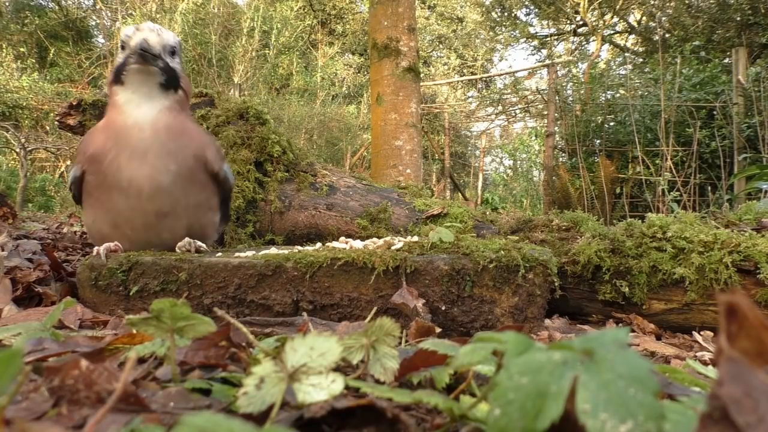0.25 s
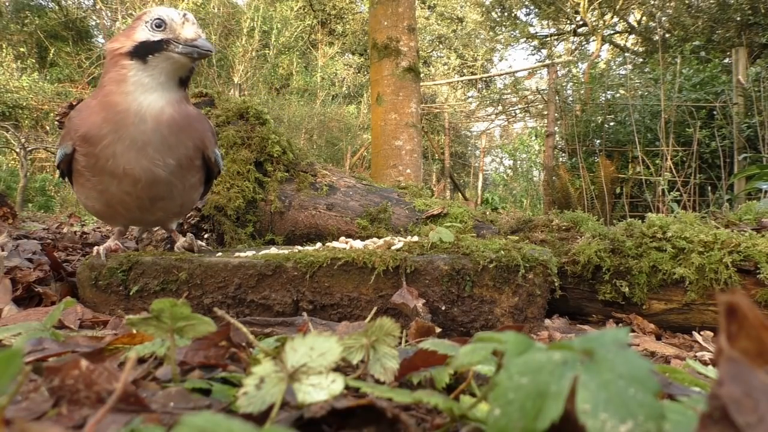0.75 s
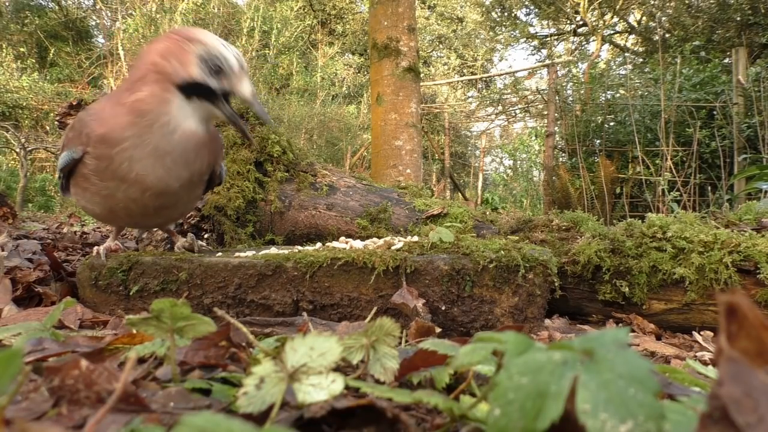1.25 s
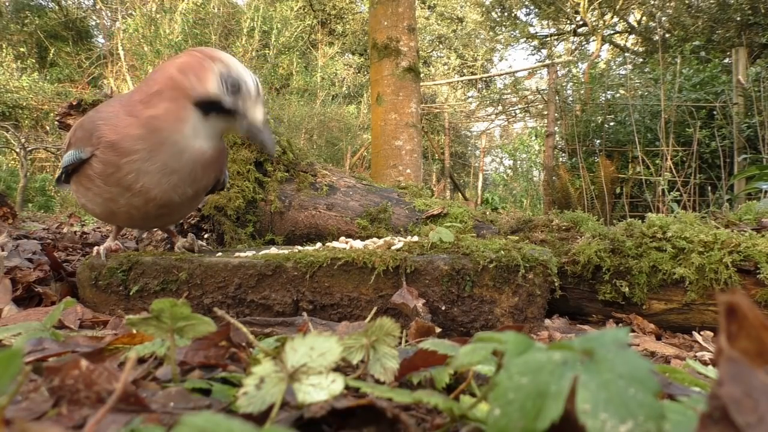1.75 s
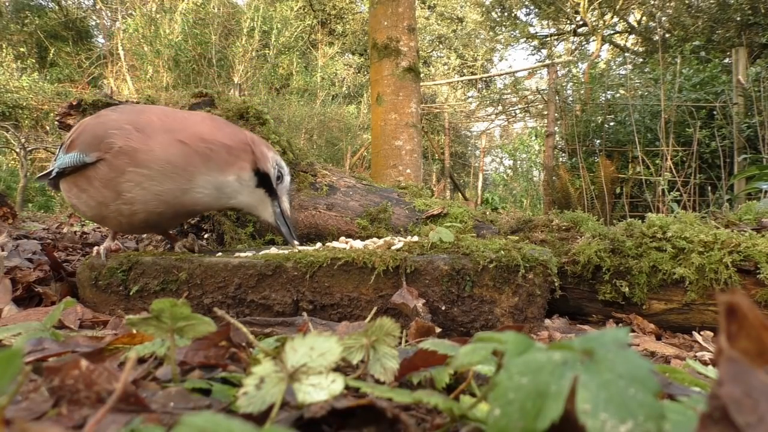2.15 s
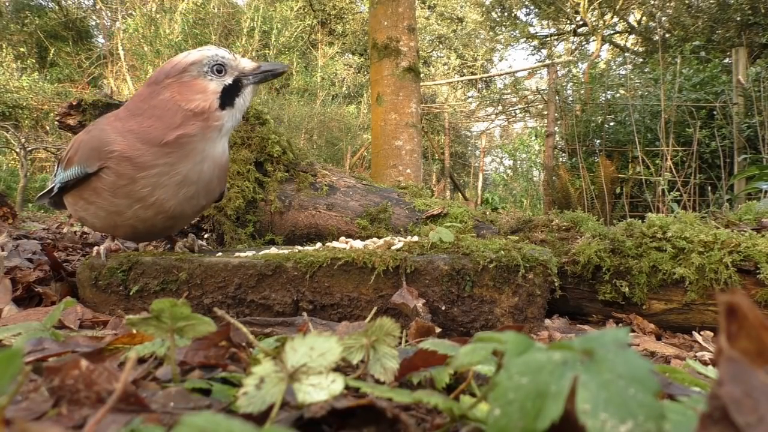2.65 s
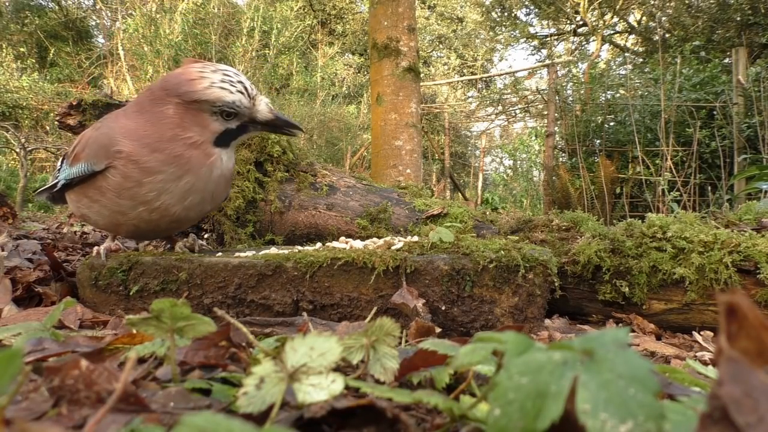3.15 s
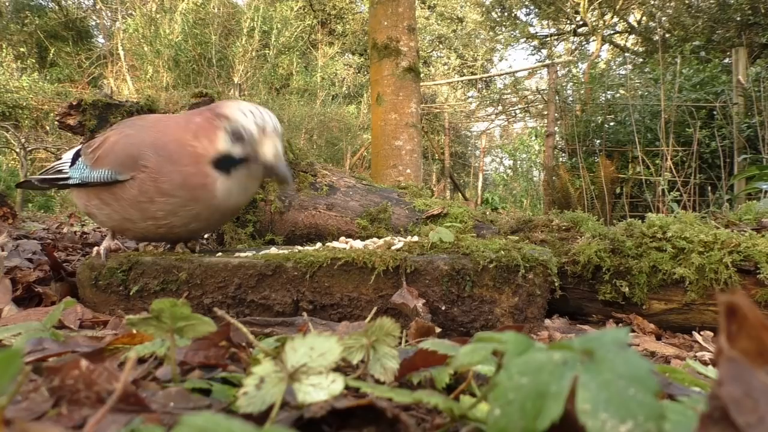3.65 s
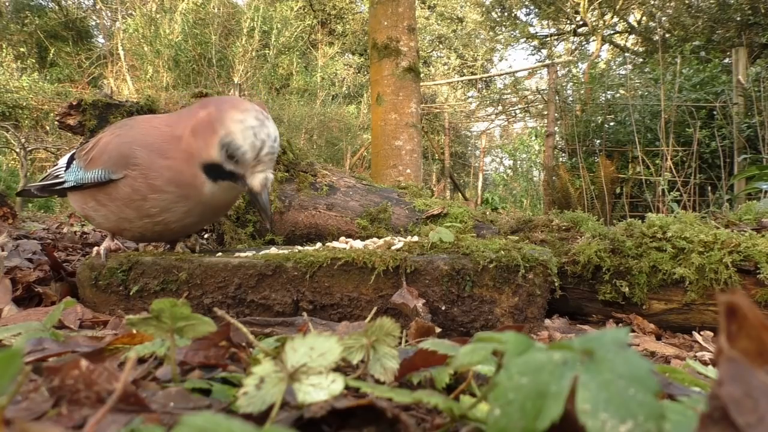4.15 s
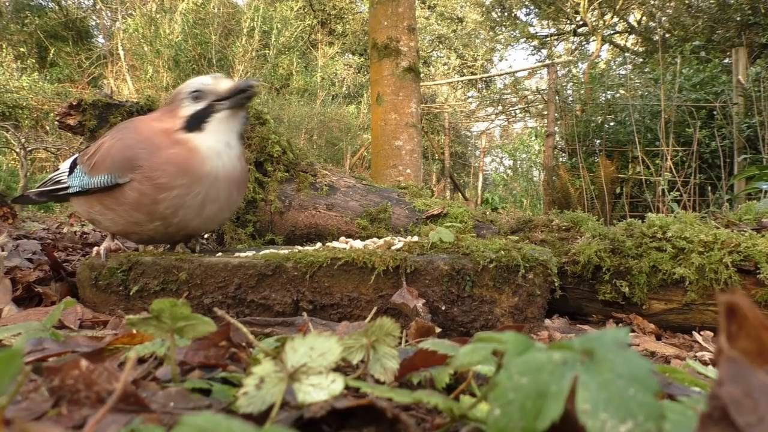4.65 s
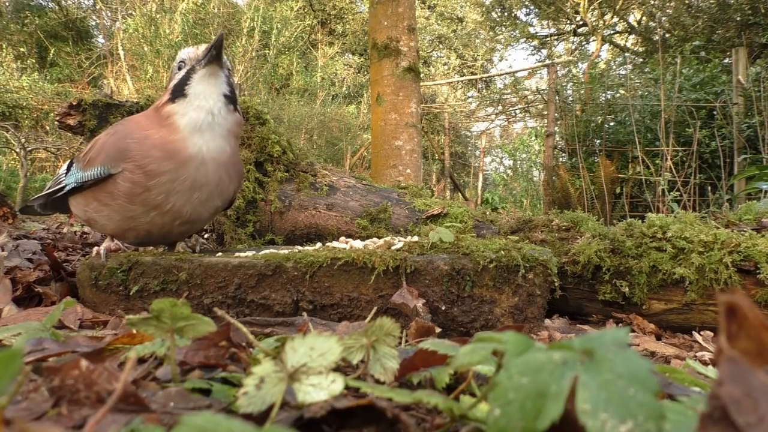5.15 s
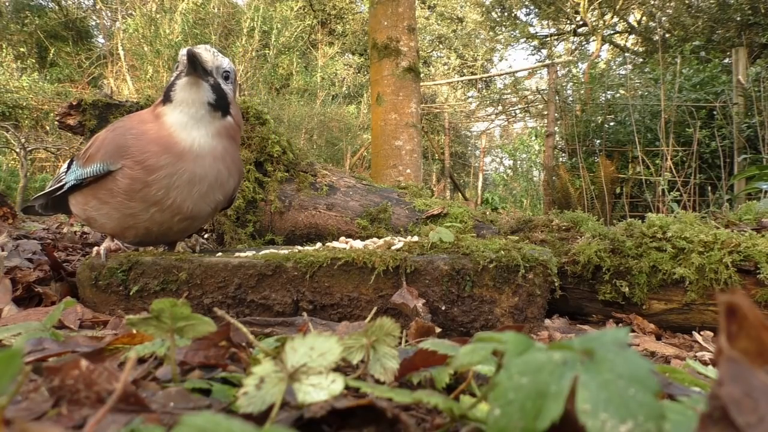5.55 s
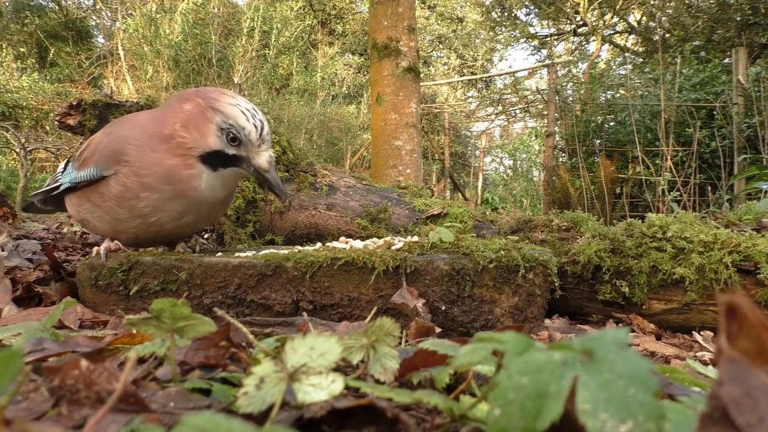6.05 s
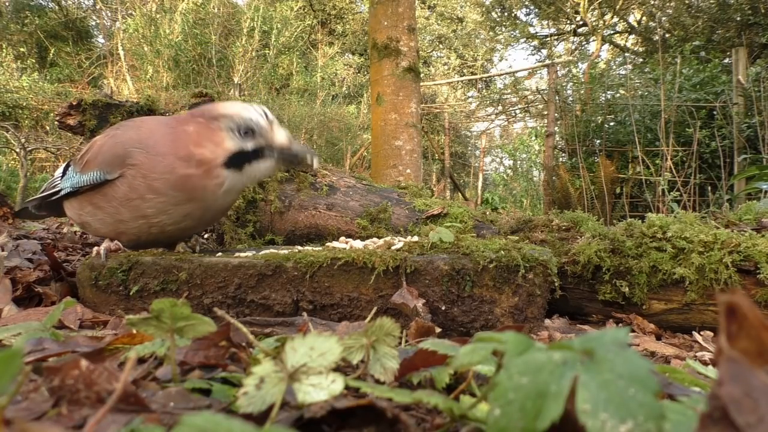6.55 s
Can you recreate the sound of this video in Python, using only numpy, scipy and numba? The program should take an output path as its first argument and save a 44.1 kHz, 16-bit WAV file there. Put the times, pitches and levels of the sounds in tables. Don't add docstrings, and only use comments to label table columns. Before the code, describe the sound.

A jay close by lands on a log, pecks at seeds and gives three harsh rasping screeches while small birds whistle and scold in woodland.

```python
import sys
import numpy as np
from scipy import signal
from scipy.io import wavfile
from scipy.ndimage import uniform_filter1d
from numba import njit

SR = 44100
rng = np.random.default_rng(int(sys.argv[2]) if len(sys.argv) > 2 else 0)


def persist_wave(psi):
    counts = np.round(np.clip(psi, -1, 1) * 32767).astype(np.int16)
    wavfile.write(sys.argv[1], SR, np.atleast_2d(counts).T)


def convert_level_to_amplitude(level_db):
    exponent = np.asarray(level_db, float) / 20
    return 10 ** exponent


N = 300321

# pitch_hz, level_db (per Hz)
TRAFFIC_SPECTRUM = [(12, -45), (20, -14.5), (69, -0.5), (97, -4.5), (129, -3), (201, -5), (286, -8),
                    (315, -6.5), (393, -10), (743, -26.5), (900, -21), (1170, -51), (1980, -120)]
# pitch_hz, level_db (per Hz)
HISS_SPECTRUM = [(500, -33), (850, -6.5), (1180, -0.5), (1690, -5), (1820, -4.5), (2570, -7), (3120, -6.5),
                 (3990, -12), (8450, -22), (12100, -16.5), (16000, -18.5)]
# pitch_hz, likeness_0_to_1
AIR_LIKENESS = [(30, 0.35), (70, 0.63), (180, 0.25), (550, 0.19), (1650, 0.081), (4970, 0.35),
                (15000, 0.75)]
# pitch_hz, left_minus_right_db
AIR_LEAN = [(60, -2), (240, 0.5), (950, 0), (3770, 0.5), (15000, 0.5)]
AIR_DB, HISS_RE_TRAFFIC_DB = -56.5, -16
STIR_DB, SETTLE_S, CALM_DB, BREEZE_DB_PER_S = 7.5, 0.42, -3.6, 0.4

# start_s, end_s, from_hz, to_hz, level_db (rms)
FAR_THIN = [
    (0, 0.144, 7120, 7060, -70),
    (1.672, 1.688, 6440, 6150, -61.5),
    (2.402, 2.412, 7800, 7580, -64),
    (6.571, 6.664, 3890, 3830, -71),
]
FAR_FLUTING = [
    (4.36, 4.487, 3880, 3810, -66.5),
    (4.474, 4.664, 3450, 3325, -63.5),
    (4.659, 4.81, 3500, 3360, -74),
    (5.479, 5.952, 3830, 3780, -66),
    (5.607, 5.86, 3240, 3180, -74),
    (5.94, 6.15, 3110, 3130, -69),
]
FAR_TWITTER = [
    (4.83, 5.447, 8250, 7800, -66),
    (5.405, 5.435, 3640, 3900, -64.5),
    (5.434, 5.491, 4340, 4880, -63),
    (5.54, 5.581, 5240, 6060, -69),
    (5.57, 5.608, 5020, 4770, -64),
]
FAR_BLURS = (45, 85, 300)

# start_s, peak_db, pitch_hz, left_minus_right_db
DULL_TICKS = [
    (0.127, -36, 2600, 5),
    (0.283, -31, 1970, 5),
    (0.285, -37, 960, 5),
    (0.289, -34, 2300, 2),
    (2.1765, -42.5, 1360, 2.5),
    (5.043, -37, 2830, 2.5),
    (6.77, -34, 3380, 4),
    (6.796, -38, 1290, 2),
]
BRIGHT_TICKS = [(0.281, -27.5, 11000, 4.4), (0.2876, -42, 9470, 4.2), (0.2944, -42, 6080, 1.5),
                (0.3666, -40.5, 8250, 4.0), (0.375, -41, 10000, 3.5), (0.384, -51, 11100, 1.5),
                (1.313, -29.5, 5500, 2.5), (3.122, -26, 8800, 3.2), (4.349, -35.5, 8400, 2.5),
                (4.368, -43, 7050, 1.5), (5.636, -54, 6050, 1.5), (6.77, -40, 10900, 4),
                (6.785, -33, 7390, 3.7)]
# start_s, peak_db, pitch_hz, t60_s
LANDING_THUD = (.281, -44, 430, .05)
DULL_T60_S, BRIGHT_T60_S = 0.0039, 0.0053

# after_start_s, pitch_hz, level_db (rms)
CHIP_CONTOUR = [
    (0, 7900, -60),
    (.004, 6600, -51),
    (.009, 4200, -56),
    (.013, 3100, -61),
    (.021, 2330, -63),
    (.04, 2420, -63),
    (.055, 2600, -60),
    (.060, 3500, -48),
    (.074, 2100, -65),
]
# start_s, stretch_ratio, pitch_ratio, level_db
CHIP_CALLS = [
    (0.271, .96, .99, 4.5),
    (3.772, 1.01, 1.01, 1.5),
]
CHIP_HELD_FROM_S, CHIP_HELD_TO_S, CHIP_OVERTONE_DB = .012, .055, -4
# delay_s, level_db
TRUNK_ECHOES = [
    (.010, -11),
    (.019, -15),
]

# start_s, throat_level_db, beak_gape_0_to_1
SCREECHES = [
    [(1.008, -44, 0.2), (1.054, -29, 0.32), (1.076, -19.5, 0.49), (1.102, -23, 0.89), (1.252, -28.5, 0.91),
     (1.31, -31.5, 0.62), (1.335, -53, .51)],
    [(3.098, -50, 0.2), (3.118, -29.5, 0.08), (3.164, -28.5, 0.49), (3.228, -36, 0.7), (3.308, -28.5, 0.42),
     (3.34, -30.5, 0.33), (3.365, -47, 0.06)],
    [(6.259, -44.5, 0.2), (6.279, -27, 0.09), (6.321, -24, .33), (6.405, -30.5, 0.47), (6.447, -25, 0.32),
     (6.489, -30.5, .46), (6.533, -42, 0.07), (6.548, -64, .1)],
]
# start_s, syrinx_beats_hz, roughness_0_to_1
VOICING = [
    [(1.008, 180, .25), (1.15, 174, .5), (1.25, 163, .7), (1.31, 161, .7), (1.335, 161, .5)],
    [(3.098, 153, .2), (3.18, 154, .45), (3.22, 160, .95), (3.335, 173, .95), (3.365, 173, .4)],
    [(6.259, 170, .1), (6.29, 153, .25), (6.33, 147, .4), (6.365, 150, .95), (6.5, 170, .95),
     (6.548, 173, .4)],
]
# shut_throat_hz, open_beak_hz, air_sac_db, top_db (re beak), chest_db (re throat)
POSTURES = [
    (1180, 3020, -29.5, -14.5, -30.5),
    (1265, 3260, -34.5, -10.5, -31.5),
    (1276, 3510, -29.5, -13, -33.5),
]
SHUT_SHARES = (.6, .9, .9)
# pitch_hz, width_hz, level_db
BEAK_MODES = [
    [(1900, 450, -10), (3450, 600, -3), (4050, 550, -1)],
    [(2050, 500, -2), (3750, 600, -3), (4600, 600, -2)],
    [(2300, 600, -2), (3900, 600, -5), (4650, 500, -6)],
]
# pitch_hz, width_hz, level_db
TOP_MODES = [
    [(5440, 1200, -2), (6600, 1200, -1), (9790, 360, -3), (12740, 600, -9.5), (14300, 1200, -21.5)],
    [(5200, 530, 2.5), (7100, 860, 1.5), (10750, 660, -8), (14000, 720, -14), (12000, 800, -26)],
    [(5270, 700, -0.5), (6500, 640, 3), (9600, 890, -8.5), (11900, 900, -13.5), (14700, 900, -19)],
]
THROAT_HZ_PER_GAPE = 130
BEAK_SHUT_DB, BEAK_GAPE_DB = -14, 26.5
BEAK_WIDTH_HZ, BEAK_PEAK_DB = 346, 1.5
SAC_FILL_S, SAC_EMPTY_S, SAC_FADE_DB = .085, .035, -5
SAC_SLACK_HZ, SAC_FULL_HZ, SAC_WIDTH_HZ, SAC_SWELLING_WIDTH_HZ = 360, 900, 300, 500
GROUND_S, GROUND_DB = .0004, -20

# start_s, length_s, pitch_hz, sag_hz_per_s, swoop_from_hz
WHISTLES = [
    (1.838, .06, 7200, 700, 3500),
    (4.114, .062, 7045, 0, 2520),
    (4.729, .109, 7225, 3200, 6000),
    (4.908, .018, 7100, 0, 6200),
    (4.928, .084, 7040, 2600, 3000),
    (5.088, .094, 7050, 3400, 6300),
    (6.085, .083, 7340, 400, 3500),
]
# peak_level_db (rms), peak_place_0_to_1
WHISTLE_SWELLS = [
    (-48, 0.9),
    (-48, 0.6),
    (-43, 0.3),
    (-46.5, 1),
    (-44, 0.4),
    (-44.5, 1),
    (-52, 1),
]
SWOOP_S, SWOOP_HZ_PER_S, SWOOP_DB_PER_KHZ = .005, 330000, -3.2
SWELL_DB, EBB_DB, END_S, END_DB, END_DROOP_HZ = -4.5, -5, .011, -9, 90

# start_s, level_db (rms)
CHURR_PHRASES = [
    [(1.945, -60.5), (2.021, -61.5), (2.094, -63.5), (2.151, -63)],
    [(3.377, -66.5), (3.428, -62.5), (3.5, -61), (3.563, -62.5), (3.636, -69.5)],
    [(4.232, -59), (4.304, -60), (4.373, -62), (4.441, -62.5)],
    [(5.045, -57), (5.113, -57.5), (5.173, -60), (5.249, -59.5), (5.315, -61.5), (5.381, -65)],
    [(6.219, -61)],
]
# pitch_hz, width_hz, level_db
CHURR_LOW = [
    (1900, 400, -4),
    (3200, 710, -1),
    (3940, 1260, -1.5),
]
CHURR_HIGH = [
    (5270, 4400, -18.5),
    (7500, 1800, -0.5),
    (10000, 2000, -5.5),
]
SYLLABLE_S, OPENING_S, BRIGHT_DB, OPENING_BRIGHT_DB = 0.046, 0.054, -4.5, -7.5

RELEASE_DB_PER_S, CUTOFF_HZ = 35, 16600


def rms_one(x):
    return x / np.sqrt(np.mean(x ** 2) + 1e-20)


def at_hz(points, hz):
    points = np.array(points)
    return np.interp(np.log(hz), np.log(points[:, 0]), points[:, 1])


def span(rows):
    s, *columns = np.transpose(rows)
    first, last = round(s[0] * SR), round(s[-1] * SR)
    t = np.arange(first, last) / SR
    return first, [np.interp(t, s, column) for column in columns]


def add(out, at, x):
    out[at:at + len(x)] += x[:len(out) - at]


def soft_ends(n, rise_s, fall_s):
    t = np.arange(n) / SR
    return np.clip(t / rise_s, 0, 1) * np.clip(t[::-1] / fall_s, 0, 1)


def drift(n, rate_hz):
    r = np.exp(-2 * np.pi * rate_hz / SR)
    slow = signal.lfilter([1], [1, -2 * r, r * r], rng.standard_normal(n + 4000))
    return rms_one(slow[4000:])


@njit
def resonate(x, turn, r):
    y = np.zeros(len(x))
    for i in range(2, len(x)):
        drive = (1 - r[i] ** 2) / 2 * (x[i] - x[i - 2])
        y[i] = drive + 2 * r[i] * np.cos(turn[i]) * y[i - 1] - r[i] ** 2 * y[i - 2]
    return y


def mode(x, hz, width_hz):
    steady = np.ones(len(x))
    return resonate(x, 2 * np.pi * hz / SR * steady, np.exp(-np.pi * width_hz / SR) * steady)


def modes(x, table, share=1):
    return sum((-1) ** k * convert_level_to_amplitude(db) * mode(x, hz * share, width) for k, (hz, width, db) in enumerate(table))


def evened(x, over_s=0.022):
    n = int(over_s * SR)
    power = uniform_filter1d(uniform_filter1d(x ** 2, n), n)
    return x / np.sqrt(power + 1e-12)


def sides(x, lean_db):
    return x * convert_level_to_amplitude(np.array([[.5], [-.5]]) * lean_db)


def trees(x, t60, db):
    t = np.arange(SR // 2) / SR
    tail = rng.standard_normal((2, len(t))) * convert_level_to_amplitude(-60 * t / t60) * np.clip(t / 0.016, 0, 1)
    tail /= np.sqrt(np.sum(tail ** 2, axis=1, keepdims=True))
    return convert_level_to_amplitude(db) * signal.fftconvolve(x[None], tail, axes=1)[:, :N]


def air(patchy_db):
    out, bounds = 0, 20 * 2 ** np.arange(0, 9.8, 1 / 3)
    white = rng.standard_normal((2, 2, N + SR // 2))
    t = np.arange(N) / SR
    rustle_db = STIR_DB / (1 + (t / SETTLE_S) ** 4) + CALM_DB + BREEZE_DB_PER_S * t
    for k, (low, high) in enumerate(zip(bounds, bounds[1:])):
        band = signal.butter(2, [low, high], "band", fs=SR, output="sos")
        mid, side = signal.sosfilt(band, white[k % 2])[:, -N:]
        hz = np.sqrt(low * high)
        alike = np.clip(at_hz(AIR_LIKENESS, hz), 0, .99)
        still_db = at_hz(TRAFFIC_SPECTRUM, hz) if hz < 850 else HISS_RE_TRAFFIC_DB + at_hz(HISS_SPECTRUM, hz)
        gain = convert_level_to_amplitude(still_db + patchy_db * drift(N, 11.9) + rustle_db * (2000 < hz < 6500))
        pair = np.sqrt(1 + alike) * mid + np.sqrt(1 - alike) * side * [[1], [-1]]
        out = out + gain * sides(pair, at_hz(AIR_LEAN, hz))
    return convert_level_to_amplitude(AIR_DB + 1.5) * rms_one(out)


def far_notes():
    out = np.zeros(N)
    for bird, blur_hz in zip((FAR_THIN, FAR_FLUTING, FAR_TWITTER), FAR_BLURS):
        for start, end, from_hz, to_hz, db in bird:
            n = round((end - start) * SR)
            turn = 2 * np.pi * np.cumsum(np.linspace(from_hz, to_hz, n)) / SR
            note = drift(n, blur_hz) * np.sin(turn) + drift(n, blur_hz) * np.cos(turn)
            shape = soft_ends(n, 0.0022 + 0.027 * n / SR, 0.0016 + 0.16 * n / SR)
            add(out, round(start * SR), convert_level_to_amplitude(db) * note * shape)
    return out


def ticks():
    out, t = np.zeros((2, N)), np.arange(int(.012 * SR)) / SR
    rows = [row + (DULL_T60_S,) for row in DULL_TICKS] + [row + (BRIGHT_T60_S,) for row in BRIGHT_TICKS]
    cracks = rng.standard_normal((len(rows), len(t)))
    for crack, (s, db, hz, lean_db, t60) in zip(cracks, rows):
        crack = mode(mode(crack * convert_level_to_amplitude(-60 * t / t60), hz, 0.76 * hz), hz, 4.5 * hz)
        crack = convert_level_to_amplitude(db + 0.5) * crack / np.abs(crack).max()
        at = round(s * SR)
        out[:, at:at + len(t)] += sides(crack, lean_db)[:, :N - at]
    s, db, hz, t60 = LANDING_THUD
    after = np.clip(np.arange(N) / SR - s, 0, None)
    return out + convert_level_to_amplitude(db - 60 * after / t60) * np.sin(2 * np.pi * hz * after)


def sing(hz, db, overtone_db):
    turn = 2 * np.pi * np.cumsum(hz) / SR
    tone = np.sin(turn) + convert_level_to_amplitude(overtone_db) * np.sin(2 * turn)
    return np.sqrt(2) * convert_level_to_amplitude(db) * tone * soft_ends(len(hz), 0.0026, 0.00049)


def chips():
    out = np.zeros(N)
    for s, stretch, share, db in CHIP_CALLS:
        _, (hz, level_db) = span(np.array(CHIP_CONTOUR) * [stretch, share, 1])
        t = np.arange(len(hz)) / SR / stretch
        held = (t > CHIP_HELD_FROM_S) & (t < CHIP_HELD_TO_S)
        overtone_db = np.where(held, CHIP_OVERTONE_DB, -35)
        add(out, round(s * SR), sing(hz, level_db + db + 2 * drift(len(hz), 210), overtone_db))
    return out + sum(convert_level_to_amplitude(db) * np.roll(out, round(s * SR)) for s, db in TRUNK_ECHOES)


def syrinx(per_s, rough):
    n = len(per_s)
    cycles = np.cumsum(per_s * (1 + .08 * rough * drift(n, 50))) / SR + .78
    phase = cycles % 1
    strength = convert_level_to_amplitude(1.2 * rng.standard_normal(200))[(cycles + .25).astype(int)]
    snaps = np.diff((cycles + .2).astype(int), prepend=0) * 5.0 * (1 - rough)
    from_beat = (phase + .5) % 1 - .5
    gate = np.exp(-.5 * (from_beat / (.07 + .22 * rough)) ** 2) + 1.2 * rough ** 3
    habit = rng.standard_normal(256)[(phase * 256).astype(int)]
    slaps = (1 - rough) * .7 * habit + np.sqrt(rough) * rng.standard_normal(n)
    return strength * (snaps + gate * slaps), cycles


def jay():
    out = np.zeros(N)
    screeches = zip(SCREECHES, VOICING, POSTURES, SHUT_SHARES, BEAK_MODES, TOP_MODES)
    for rows, voicing, posture, shut, beak_modes, top_modes in screeches:
        throat_hz, open_hz, sac_db, top_db, chest_db = posture
        at, (db, gape) = span(rows)
        n = len(db)
        per_s, rough = span(voicing)[1]
        source, cycles = syrinx(per_s, rough)

        full = soft_ends(n, SAC_FILL_S, SAC_EMPTY_S) ** 1.54
        sac_hz = SAC_SLACK_HZ + (SAC_FULL_HZ - SAC_SLACK_HZ) * full
        swelling = np.sin(np.pi * (.2 + .8 * soft_ends(n, 1.4 * SAC_FILL_S, 1e-4)))
        sac_width = SAC_WIDTH_HZ + SAC_SWELLING_WIDTH_HZ * swelling
        sac_db = sac_db + SAC_FADE_DB * (2 - soft_ends(n, 1e-4, SAC_EMPTY_S))
        sac = mode(mode(source, sac_hz, sac_width), sac_hz, 0.64 * sac_width)

        throat_hz = throat_hz + THROAT_HZ_PER_GAPE * gape
        throat = mode(mode(source, throat_hz, 220), throat_hz, 330)
        chest = np.sin(2 * np.pi * cycles) + 1.3 * np.sin(4 * np.pi * cycles)

        share = shut + (1 - shut) * soft_ends(n, 1.24 * SAC_FILL_S, 1e-4)
        beak_db = db + BEAK_SHUT_DB + BEAK_GAPE_DB * gape
        beak = modes(source, beak_modes[:1], share)
        beak -= convert_level_to_amplitude(BEAK_PEAK_DB) * mode(source, open_hz * share, BEAK_WIDTH_HZ)
        opening_db = -7 * np.clip(1 - sac_hz / 850, 0, 1)
        beak += convert_level_to_amplitude(opening_db) * modes(source, beak_modes[1:], share) + 0.033 * source
        beak = signal.sosfilt(signal.butter(2, [1450, 5600], "band", fs=SR, output="sos"), beak)
        top = modes(source, top_modes, share ** 0.11)
        top = signal.sosfilt(signal.butter(2, 4500, "high", fs=SR, output="sos"), top)

        voice = convert_level_to_amplitude(db) * (evened(throat) + convert_level_to_amplitude(chest_db) * chest) - convert_level_to_amplitude(sac_db) * evened(sac)
        voice += convert_level_to_amplitude(beak_db) * (evened(beak) + convert_level_to_amplitude(top_db) * evened(top))
        add(out, at, voice * soft_ends(n, 0.00067, 0.021))
    return out


def whistles():
    out = np.zeros(N)
    for (s, length, hz, sag, from_hz), (db, share) in zip(WHISTLES, WHISTLE_SWELLS):
        swoop_s = SWOOP_S + (hz - from_hz) / SWOOP_HZ_PER_S
        swoop_db = SWOOP_DB_PER_KHZ * (hz - from_hz) / 1000
        held_s = length - END_S
        peak_s = np.clip(share, .05, .95) * held_s
        start_db, ebb_db = db + SWELL_DB, db + EBB_DB * (1 - share)
        at, (hz, db) = span([
            (s - swoop_s, from_hz, start_db + swoop_db),
            (s - .35 * swoop_s, .15 * from_hz + .85 * hz, start_db + .5 * swoop_db),
            (s, hz, start_db),
            (s + peak_s, hz - sag * peak_s, db),
            (s + held_s, hz - sag * held_s, ebb_db),
            (s + length, hz - sag * length - END_DROOP_HZ, ebb_db + END_DB)])
        n = len(hz)
        add(out, at, sing(hz * (1 + .002 * drift(n, 80)), db + 1.5 * drift(n, 60), overtone_db=-30))
    return out


def churrs():
    throb_hz = 280 * (1 + 0.075 * drift(N, 28.4))
    throb = 1 + 0.11 * np.sin(2 * np.pi * np.cumsum(throb_hz) / SR)
    buzz = rng.standard_normal(N) * throb
    low_gain, high_gain = np.zeros((2, N))
    for phrase in CHURR_PHRASES:
        for k, (s, db) in enumerate(phrase):
            length, bright_db = (SYLLABLE_S, BRIGHT_DB) if k else (OPENING_S, OPENING_BRIGHT_DB)
            shape = convert_level_to_amplitude(db) * soft_ends(round(length * SR), 0.0095, 0.0069)
            add(low_gain, round(s * SR), shape)
            add(high_gain, round(s * SR), shape * convert_level_to_amplitude(bright_db))
    low, high = modes(buzz, CHURR_LOW), modes(buzz, CHURR_HIGH)
    return (low_gain * low + high_gain * high) / np.std(low)


def scene():
    far, chip, voice, thin = far_notes() + churrs(), chips(), jay(), whistles()
    near = sides(voice, lean_db=2.5) + trees(voice, t60=.35, db=-29)
    near += convert_level_to_amplitude(GROUND_DB) * np.roll(voice, round(GROUND_S * SR)) * [[1], [-1]]
    small = sides(thin, lean_db=1.5) + trees(thin, t60=0.48, db=-6.5)
    small += sides(chip, lean_db=10.5) + trees(chip, t60=0.53, db=-5.0)
    distant = sides(far, lean_db=5.5) + trees(far, t60=.4, db=-5.0)
    return air(patchy_db=2.5) + distant + ticks() + near + small


def top_cut(x):
    return signal.sosfilt(signal.butter(12, 16680, fs=SR, output="sos"), x)


def record(dry):
    level_db = 10 * np.log10(uniform_filter1d(np.mean(dry ** 2, axis=0), SR // 10) + 1e-12)
    fall_db = RELEASE_DB_PER_S * np.arange(N) / SR
    over_db = np.maximum.accumulate(np.clip(level_db + 27.5, 0, None) + fall_db) - fall_db
    low_pass = signal.cheby2(12, 60, CUTOFF_HZ, fs=SR, output="sos")
    return top_cut(signal.sosfilt(low_pass, dry * convert_level_to_amplitude(-.7 * over_db)))


dry = scene()
out = record(dry)
persist_wave(out)
```